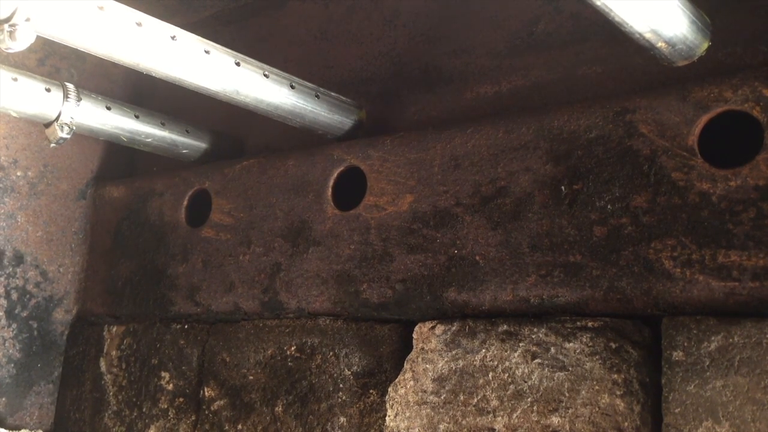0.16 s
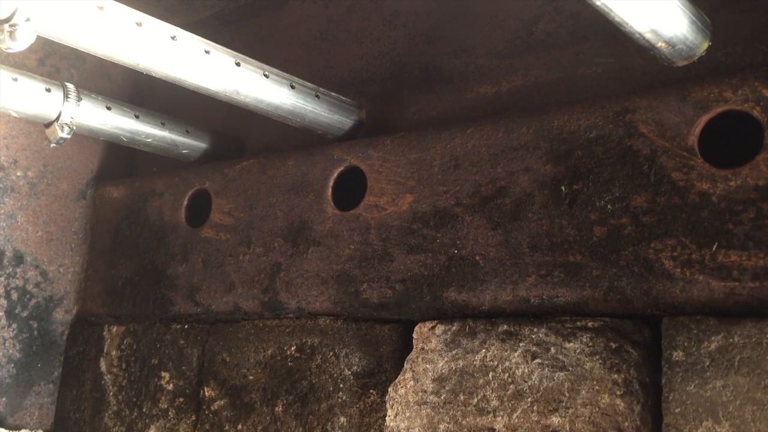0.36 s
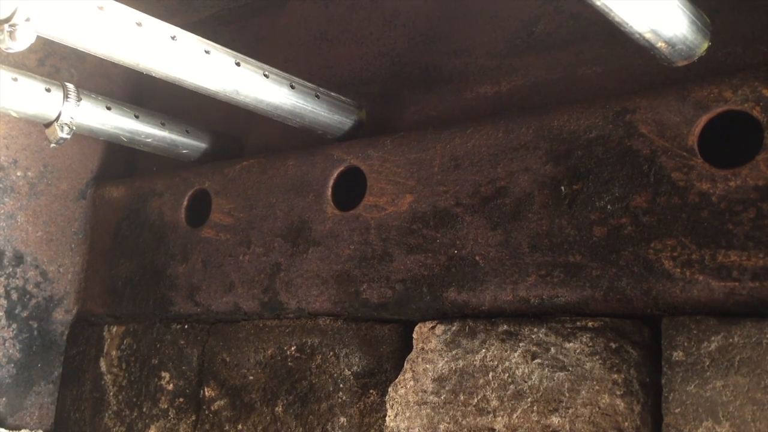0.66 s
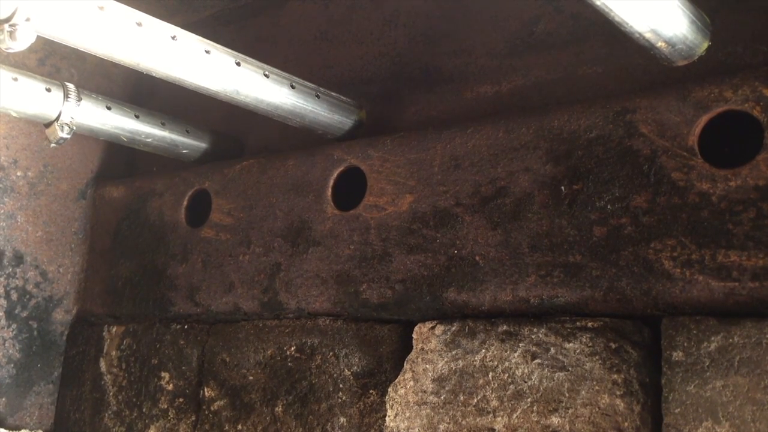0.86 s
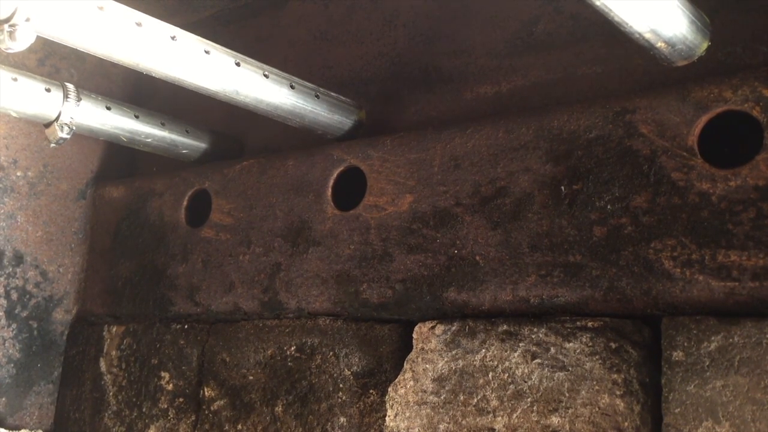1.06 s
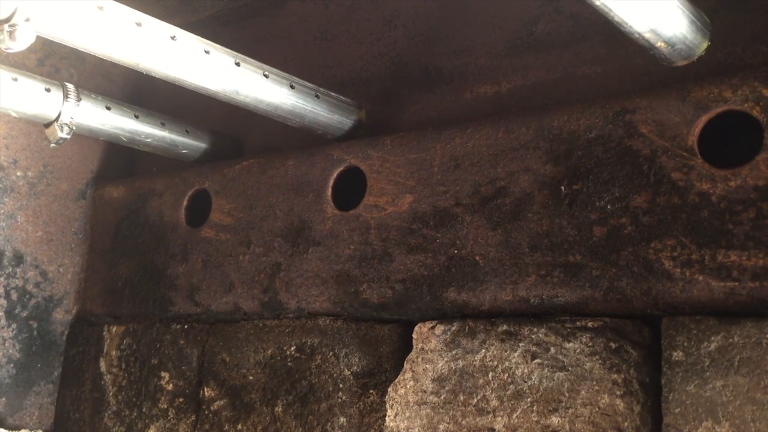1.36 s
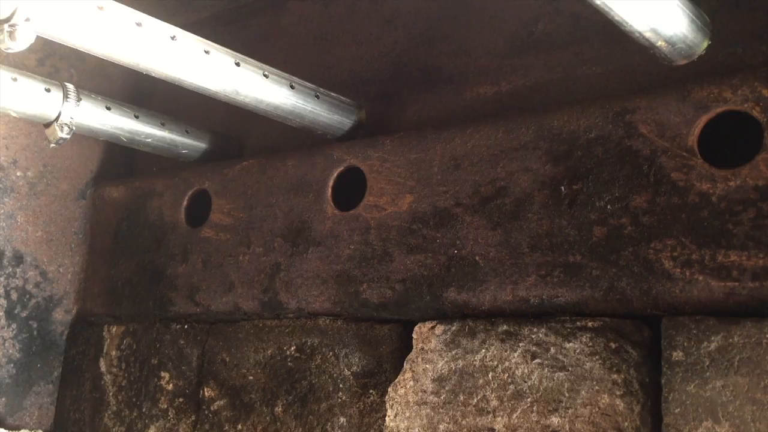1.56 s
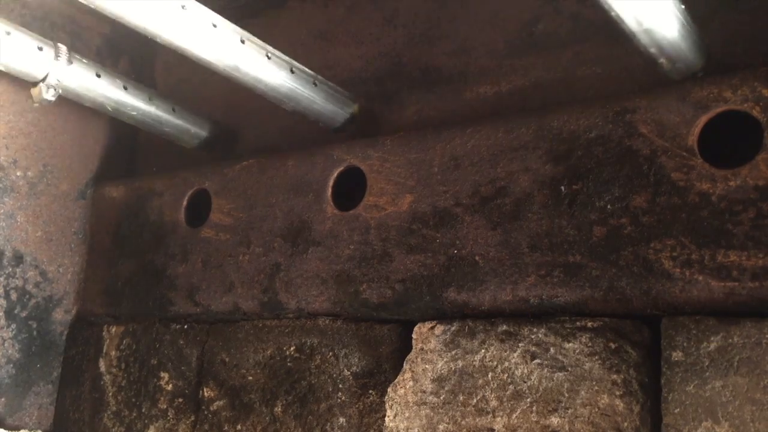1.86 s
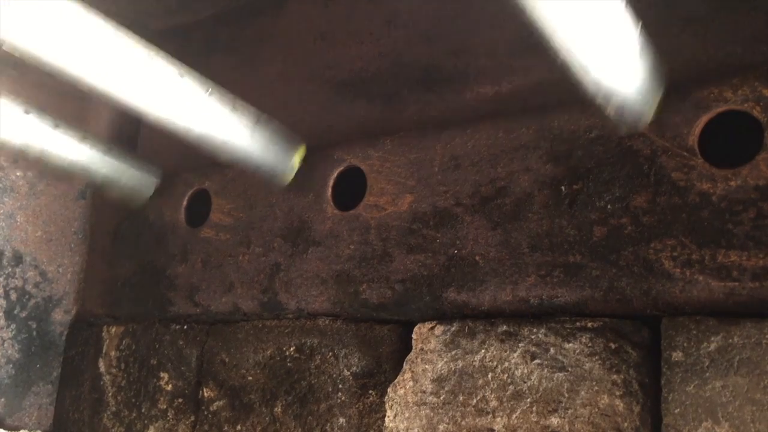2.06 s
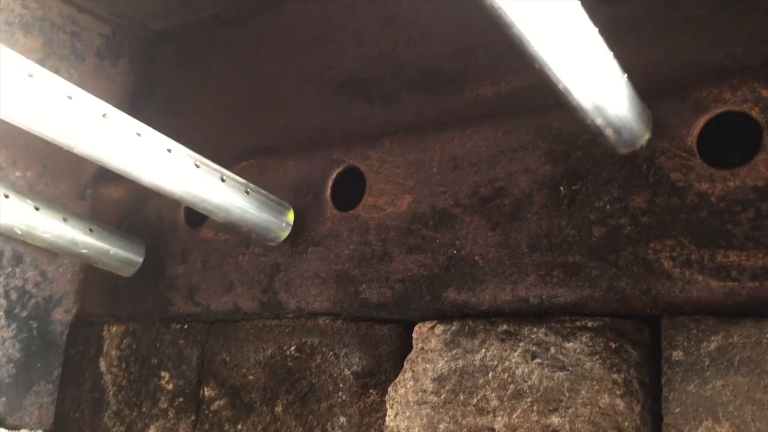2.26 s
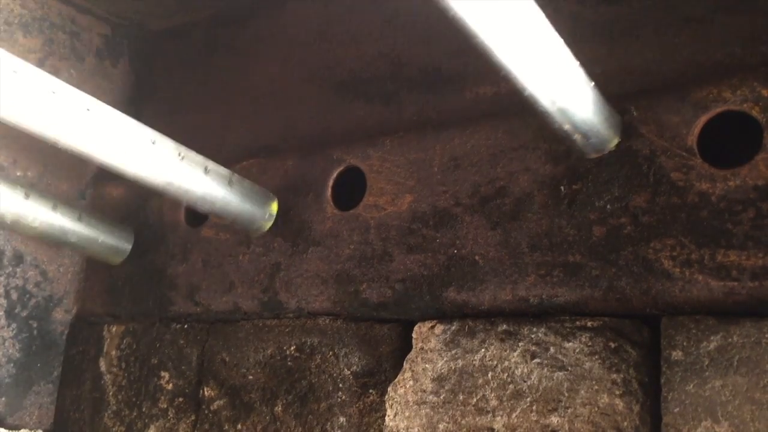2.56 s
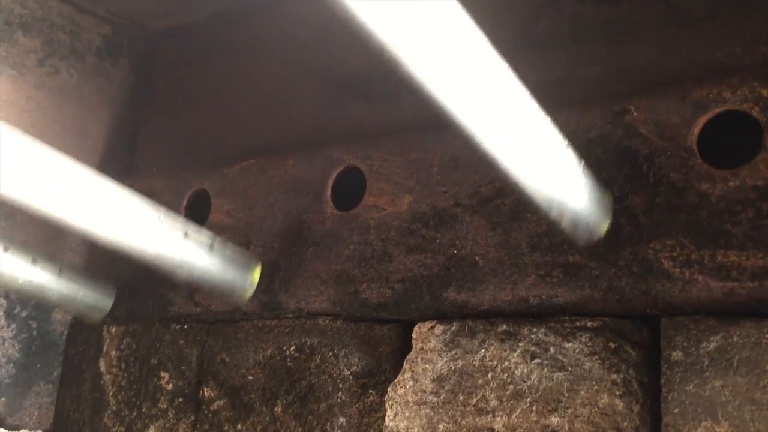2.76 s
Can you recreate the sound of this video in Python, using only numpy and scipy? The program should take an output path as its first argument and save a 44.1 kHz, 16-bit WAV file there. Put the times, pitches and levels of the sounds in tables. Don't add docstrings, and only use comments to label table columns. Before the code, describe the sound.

Metal tubes clinking on a rusty steel channel, close inside a brick-lined stove with low, quiet hum. Light ticks and faint dry scrapes come at 0.15 to 0.65 s, a firmer rattle near 0.8 s, dull touches at 1.25 to 1.45 s. From 1.7 s a loud bright clatter crowds in, its hardest blow distorting at 2.25 s. Softer loose knocks follow from 2.5 s, with short dark echo.

```python
import sys
import numpy as np
from scipy import signal
from scipy.fft import rfft, irfft
from scipy.io import wavfile
from scipy.ndimage import uniform_filter1d

SR = 44100
rng = np.random.default_rng(int(sys.argv[2]) if len(sys.argv) > 2 else 0)


def boost_factor(decibels):
    exponent = np.asarray(decibels, float) / 20
    return 10 ** exponent


def output_pcm(signal):
    pcm = np.clip(np.atleast_2d(signal).T, -1, 1) * 32767
    wavfile.write(sys.argv[1], SR, np.round(pcm).astype(np.int16))


N = 127890
GRIP_S = 0.025


def evened(x):
    return x / np.sqrt(np.mean(x ** 2) + 1e-20)


def read(points, hz):
    f, value = np.transpose(points)
    return np.interp(np.log(hz + 1), np.log(f + 1), value)


def add(mix, s, sound):
    part = mix[max(round(s * SR), 0):][:len(sound)]
    part += sound[:len(part)]


def coloured(x, spectrum, tilt_db=0):
    hz = np.fft.rfftfreq(len(x), 1 / SR)
    gain = boost_factor(read(spectrum, hz) + tilt_db * np.log2((hz + 100) / 2000))
    return evened(irfft(rfft(x) * gain, len(x)))


def fuzzy(hz, width_hz):
    f = np.fft.rfftfreq(N, 1 / SR)
    peak = 1 / (1 + ((f - hz) / width_hz) ** 2)
    return evened(irfft(rfft(rng.standard_normal(N)) * peak, N))


def cluster(modes):
    t = np.arange(SR // 3) / SR
    hz, db, t60 = np.repeat(modes, 3, axis=0).T[:, :, None]
    side = np.tile([0, -1, 1], len(modes))[:, None]
    hz = hz * (1 + 0.00728 * side * rng.uniform(0.32, 1.61, hz.shape))
    sibling_db = 1 * abs(side)
    decay = boost_factor(db + sibling_db - 60 * t / np.clip(t60, 0.02, 0.5))
    grip = 0.13 + np.exp(-t / GRIP_S)
    return decay * np.sin(2 * np.pi * hz * t) * grip


def rings(bank):
    luck = rng.standard_normal((2, len(bank)))
    spread_db = 2.5
    x = (boost_factor(spread_db * luck[0]) * np.sign(luck[1])) @ bank
    return x / np.linalg.norm(x[:SR // 50])


def dying(spectrum, t60s, size):
    hz, t, z = signal.stft(rng.standard_normal(size), SR, nperseg=256)
    z = z * boost_factor(read(spectrum, hz)[:, None] - 60 * t / read(t60s, hz)[:, None])
    x = signal.istft(z, SR, nperseg=256)[1]
    return x / np.linalg.norm(x[:SR // 50])


def air():
    # frequency in Hz, level in dB.
    room = [(25, -45), (75, 5), (200, -58), (380, -16), (700, -36), (1100, -24.5), (1850, -23), (2600, -32),
            (5000, -37)]
    hum = boost_factor(-70) * fuzzy(385, 22)
    return boost_factor(-56.5) * coloured(rng.standard_normal(N), room) + hum


def boom():
    # start in seconds, level in dB, length in seconds.
    plate_knocks = [(0.0, -42.5, 0.11), (0.163, -43, 0.12), (.86, -39, 0.082), (0.991, -45.5, 0.076),
                    (1.193, -54, 0.19), (1.739, -31, 0.15), (1.954, -33, 0.09), (2.032, -27, 0.1),
                    (2.144, -35, 0.11), (2.281, -23.5, 0.13), (2.46, -31.5, 0.14), (2.556, -41, 0.4),
                    (2.725, -36, 0.19)]
    plate_hz, rise_s, fade_db = 117.4, 0.031, -8.5
    out = boost_factor(-61) * fuzzy(plate_hz, 12.5)
    t = np.arange(SR // 2) / SR
    for s, db, length in plate_knocks:
        rise = np.sin(np.pi / 2 * np.minimum(t / rise_s, 1))
        shape = rise * boost_factor(fade_db * (t / length) ** 2)
        hz = plate_hz * rng.uniform(0.94, 1.02)
        add(out, s, boost_factor(db) * shape * np.sin(2 * np.pi * hz * t))
    return out


def pings(metal):
    # frequency in Hz, level in dB, 60 dB decay time in seconds.
    spots = [(396, -43.5, 0.52), (5020, -36.5, 0.084), (1420, -43, 0.22), (5070, -29, 0.15),
             (5790, -31, 0.1), (379.7, -46.5, 1.35), (401, -37.5, 0.31), (2200, -39.5, 0.072),
             (2340, -45, 0.13), (413, -34, 1.2), (1637, -11.5, 0.043), (827, -21, 0.12), (7020, -38, 0.4),
             (7740, -44, 0.59), (4830, -38, 0.1), (209, -28, 0.051), (1404, -33, 0.056), (2890, -36, 0.22),
             (234, -39, 0.058), (660, -46, 0.11), (3600, -31.5, 0.055), (616, -51.5, 0.097),
             (4430, -50, 0.64), (10100, -50, 0.45), (3000, -44.5, 0.12), (351, -32, 0.11),
             (430.5, -54, 0.25)]
    strikes = [0.0, .162, .165, .328, .328, .765, .803, 1.263, 1.44, 2.0, 2.147, 2.208, 2.285, 2.62, .328,
               2.743, 2.743, 2.88, .8, .165, .16, .655, 2.285, 2.285, 1.445, 2.744, 1.335]
    t = np.arange(SR // 2) / SR
    for s, (hz, db, t60) in zip(strikes, spots):
        near_hz = hz * (1 + 0.069 * rng.standard_normal(size=(3, 1)))
        neighbours = 0.33 * np.sin(2 * np.pi * near_hz * t).sum(0) * np.exp(-t / GRIP_S)
        rise_s = 0.0021 + 1.17 / hz
        shape = boost_factor(db - 60 * t / t60) * np.minimum(t / rise_s, 1)
        add(metal, s, shape * (np.sin(2 * np.pi * hz * t) + neighbours))


def slide(tube, wall, ring_db, s, length, db, tilt_db, rise):
    # frequency in Hz, level in dB.
    rust = [(260, -20), (700, -10.5), (2000, -7), (5000, -3.5), (10000, -2), (15500, -5.5)]
    luck = rng.standard_normal((3, SR // 2))
    t = np.arange(SR // 2) / SR
    grain_db = 1 * evened(uniform_filter1d(luck[1], size=150))
    swell_db = 2 * evened(uniform_filter1d(luck[2], size=900))
    shape = np.sin(np.pi / 2 * np.minimum(t / max(rise, 0.002), 1)) ** 2
    shape = shape * np.exp(-np.maximum(t - length, 0) / 0.026)
    hiss = coloured(luck[0], rust, tilt_db) * boost_factor(grain_db + swell_db) * shape
    body = (rings(tube) + rings(wall))[:SR // 8]
    rung = boost_factor(ring_db) * signal.fftconvolve(hiss, body)
    add(rung, 0, hiss)
    return s, boost_factor(db) * rung


def slides(metal, tube, wall):
    # start in seconds, length in seconds, level in dB,
    # tilt in dB per octave, rise in seconds.
    rubs = [(0.0, 0.042, -50.5, -8, 0.001), (0.109, 0.045, -43, -3.6, 0.023),
            (0.246, 0.12, -49.5, -2, 0.059), (0.404, 0.09, -39.5, 0, 0.035), (0.53, 0.17, -48, -0.1, 0.08),
            (1.138, 0.13, -48.5, 1.5, 0.015), (1.295, 0.098, -55, 1.5, 0.017),
            (1.403, 0.13, -62.5, -5, 0.046), (1.71, 0.14, -31.5, -3.5, 0.028),
            (1.955, 0.047, -42, -2.5, 0.028), (2.11, 0.033, -23, -1.5, 0.039),
            (2.426, 0.18, -50.5, -5.5, 0.023), (2.529, 0.12, -44.5, -4.5, 0.013),
            (2.666, 0.029, -41.5, -5.5, 0.01), (2.72, 0.15, -48.5, -6, 0.021), (0, 0.073, -53, 4, 0.0024)]
    chatter = [
        (.775, 0.11, -43, 0.5, 0.028),
        (.9, 0.096, -51, 0.3, 0.021),
        (1.01, 0.09, -50.5, 0, 0.021),
        (2.644, 0.081, -53.5, -7, 0.021),
    ]
    # frequency in Hz, level in dB, 60 dB decay time in seconds.
    loose_modes = [(1174, -1.5, 0.11), (2215, 6, 0.06), (2460, -4, 0.06), (2903, -10.5, 0.036),
                   (4004, -6.5, 0.098)]
    loose = cluster(loose_modes)
    for row in rubs:
        add(metal, *slide(tube, wall, -11.5, *row))
    for row in chatter:
        add(metal, *slide(loose, wall, 3.5, *row))


def buzzes(metal):
    # start in seconds, length in seconds, frequency in Hz, level in dB.
    fed_modes = [(0, 0.085, 1060, -58), (0, 0.13, 1826, -60), (0.175, 0.022, 1420, -44.5),
                 (0.689, 0.035, 1375, -55.5), (0.876, 0.019, 2210, -38.5), (0.873, 0.041, 1205, -43.5),
                 (1.728, 0.0098, 2457, -26), (1.733, 0.047, 3580, -41), (1.75, 0.0089, 9800, -28.5),
                 (1.8, 0.023, 5410, -38), (1.83, 0.051, 8890, -40), (1.881, 0.0094, 3930, -33),
                 (2, 0.064, 1300, -27), (2.004, 0.043, 3980, -28), (2.005, 0.041, 8900, -36.5),
                 (2.02, 0.038, 2456, -30), (2.04, 0.11, 5480, -35.5), (2.039, 0.016, 3545, -28.5),
                 (2.105, 0.046, 9510, -34), (2.154, 0.013, 3730, -27.5), (2.248, 0.022, 2466, -15.5),
                 (2.249, 0.019, 3850, -15), (2.249, 0.019, 5480, -16), (2.25, 0.018, 3510, -20.5),
                 (2.25, 0.01, 2923, -16.5), (2.257, 0.027, 8860, -30), (1.9, 0.064, 5550, -48.5),
                 (2.247, 0.01, 4270, -40), (2.648, 0.047, 2356, -41.5), (2.67, 0.0094, 2200, -41),
                 (2.68, 0.048, 1163, -42.5), (1.503, .13, 1840, -65.5), (1.001, 0.178, 384, -57)]
    width_hz, knocks_per_s, rise_s = 42.6, 350, 0.0036
    for s, length, hz, db in fed_modes:
        luck = rng.random((2, SR // 4))
        t = np.arange(SR // 10) / SR
        knocks = ((luck[0] < knocks_per_s / SR) + 0.075) * (luck[1] - 0.5)
        ring = np.exp(-np.pi * width_hz * t) * np.sin(2 * np.pi * hz * t)
        fed = signal.fftconvolve(knocks, ring)[SR // 20:SR // 4]
        t = np.arange(len(fed)) / SR
        decay = np.exp(-np.pi * width_hz * np.maximum(t - length, 0))
        shape = np.minimum(t / rise_s, 1) * decay
        rms = np.sqrt(np.mean(fed[t < length + rise_s] ** 2))
        add(metal, s, boost_factor(db) * shape * fed / rms)


def contact(tube, wall, s, db, length, channel_db, wall_db):
    # frequency in Hz, level in dB.
    channel = [(88, -36), (150, -26), (267, -7.5), (1300, 4.5), (3270, -4.5), (3970, -15.5), (8250, -22.5),
               (9090, -23), (15000, -24)]
    # frequency in Hz, 60 dB decay time in seconds.
    channel_t60 = [(200, 0.26), (1200, 0.16), (4000, 0.11), (12000, 0.28)]
    clicks_per_s, click_db, rise_s = 2600, 1.1, 0.003
    luck = rng.random((3, SR // 10))
    t = np.arange(SR // 10) / SR
    size = boost_factor(-click_db * np.log(luck[1] + 0.0037))
    clicks = (luck[0] < clicks_per_s / SR) * size * np.sign(luck[2] - 0.5)
    rub = 0.021 * (luck[2] - 0.5)
    length = np.clip(length, 0.002, 0.08)
    shape = np.minimum(t / rise_s, 1) * np.exp(-(t / length) ** 3)
    lead = 1 + 0.65 * np.exp(-t / 0.0036)
    drive = (clicks + rub) * shape * lead
    drive /= np.linalg.norm(drive)

    body = boost_factor(-20.5) * rings(tube) + boost_factor(-11 + wall_db) * rings(wall)
    add(body, 0, boost_factor(-7 + channel_db) * dying(channel, channel_t60, size=SR // 5))
    grit = evened(rng.standard_normal(size=40) * np.hanning(40)) / np.sqrt(40)
    add(body, 0, boost_factor(-22.5 + 0.35 * (wall_db + 13)) * grit)
    level = boost_factor(db) * np.sqrt(SR / 50 + length * SR)
    return s - rise_s / 2, level * signal.fftconvolve(drive, body)


def contacts(metal, tube, wall):
    # start in seconds, peak in dB, rattle length in seconds,
    # channel level in dB, tube wall level in dB.
    touches = [
        (0.161, -23.5, 0.018, -16, -34),
        (0.33, -39, 0.0058, -42, 2),
        (0.656, -39, 0.0061, -9, 4.5),
        (0.785, -27.5, 0.05, -18, 3),
        (0.866, -20.5, 0.021, -19, 3.5),
        (1.261, -29.5, 0.025, -22.5, -32),
        (1.403, -36.5, 0.033, -29, -9),
        (1.434, -42.5, 0.0054, -3, -37),
    ]
    clatter = [(1.727, -16, 0.035, -16, -9), (1.749, -7, 0.028, -19, -9.5),
               (1.784, -9.5, 0.012, -13, -17.5), (1.884, -19, 0.019, -12, -10),
               (1.893, -24.5, 0.011, -3.5, -1), (1.91, -26.5, 0.027, -5, -8), (2.001, -11, 0.012, -8, -19),
               (2.019, -6, 0.0098, -17, -22.5), (2.039, -5, 0.033, -16, -19),
               (2.073, -13.5, 0.027, -17, -17), (2.117, -17, 0.0046, -22, -9),
               (2.132, -7, 0.014, -17.5, -27), (2.147, -5.5, 0.025, -19.5, -39),
               (2.205, -10.5, 0.017, -5.5, -16), (2.506, -34, 0.041, -3.5, -5.5),
               (2.544, -21, 0.043, -20, -8), (2.599, -24.5, 0.024, -14.5, -9.5),
               (2.739, -40, 0.023, 12.5, -40), (2.882, -25.5, 0.057, -9.5, -15)]
    clash = [
        (2.223, -3.5, 0.012, -31, -27),
        (2.234, -1.5, 0.0076, -16.5, -17.5),
        (2.248, 6.5, 0.026, -22.5, -16),
    ]
    for row in [*touches, *clatter, *clash]:
        add(metal, *contact(tube, wall, *row))


def firebox_echo(metal):
    # frequency in Hz, level in dB.
    brick = [(250, 3.5), (12000, -10.5)]
    # frequency in Hz, 60 dB decay time in seconds.
    brick_t60 = [(200, 1), (1000, 0.33), (4000, 0.22), (12000, 0.11)]
    return boost_factor(-22.5) * signal.fftconvolve(metal, dying(brick, brick_t60, size=SR // 2))[:N]


def scene():
    # frequency in Hz, level in dB, 60 dB decay time in seconds.
    tube_modes = [(829.5, -11, 0.14), (1174, -6.5, 0.55), (1286, -5.5, 0.051), (2237, 3, 0.029),
                  (2461, 1.5, 0.047), (2906, -7.5, 0.063), (3580, -5, 0.14), (3730, -4.5, 0.14),
                  (3900, -9, 0.48), (4184, 1.5, 0.04), (5360, -8, 0.15), (5620, -9.5, 0.27),
                  (5596, -6.5, 0.13)]
    wall_modes = [(7340, -6.5, 0.13), (7650, -22, 0.29), (8200, -21, 0.073), (8820, 0, 0.38),
                  (8840, -8, 0.54), (9250, -4, 0.22), (9670, 1.5, .1), (9870, -3.5, 0.063),
                  (10400, -14, 0.07), (11340, -8.5, 0.22), (12100, -11.5, .15), (14100, -21, 0.14),
                  (13600, -10.5, 0.099)]
    tube, wall = cluster(tube_modes), cluster(wall_modes)
    metal = np.zeros(N)
    pings(metal)
    slides(metal, tube, wall)
    buzzes(metal)
    contacts(metal, tube, wall)
    return (air() + boom() + metal + firebox_echo(metal))[None]


def low_pass(x):
    return signal.sosfilt(signal.butter(12, 15770, fs=SR, output="sos"), x)


def record(dry):
    bass_cut_hz, ceiling = 56, 0.66
    knee_db, squeeze, squeeze_s = -4, 0.23, 0.004
    pole = 2 * np.pi * bass_cut_hz / SR
    x = dry - signal.lfilter([0, pole], [1, pole - 1], dry)
    power = abs(uniform_filter1d(x ** 2, round(squeeze_s * SR)))
    power_db = 10 * np.log10(power + 1e-12)
    x = x / boost_factor(squeeze * np.maximum(power_db - knee_db, 0))
    x = ceiling * np.tanh(x / ceiling)
    band = signal.firwin(511, 15450, window=("kaiser", 9), fs=SR)
    x = signal.oaconvolve(x, band[None], "same")
    return low_pass(x)


dry = scene()
out = record(dry)
output_pcm(out)
```